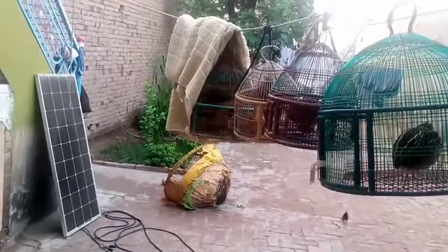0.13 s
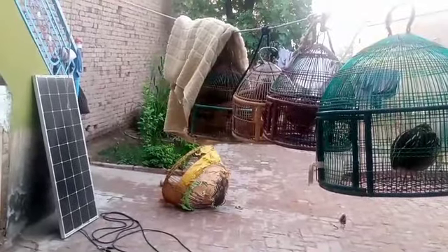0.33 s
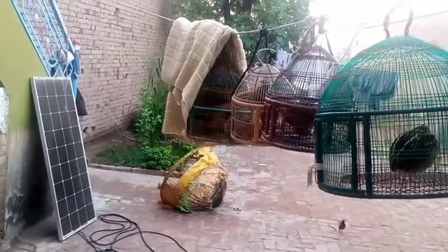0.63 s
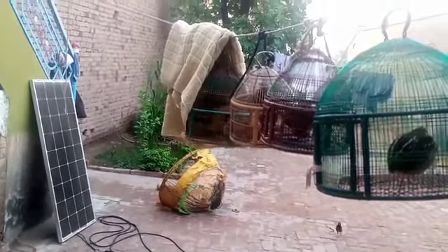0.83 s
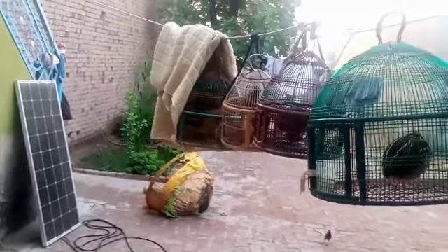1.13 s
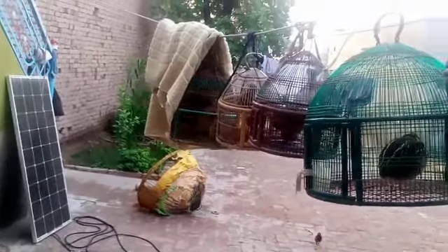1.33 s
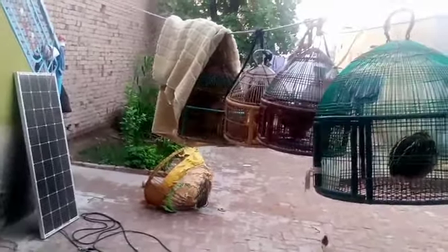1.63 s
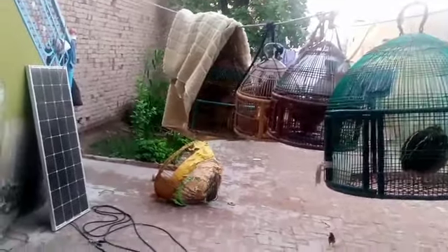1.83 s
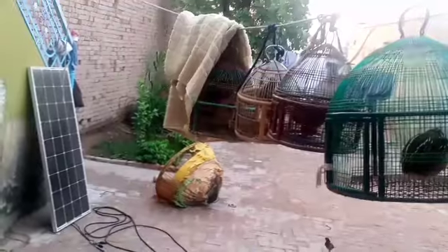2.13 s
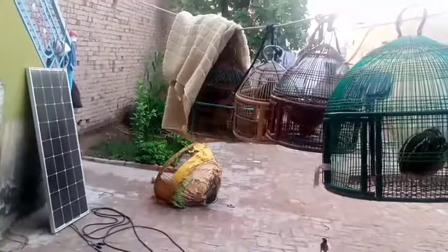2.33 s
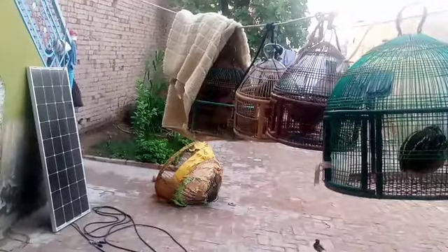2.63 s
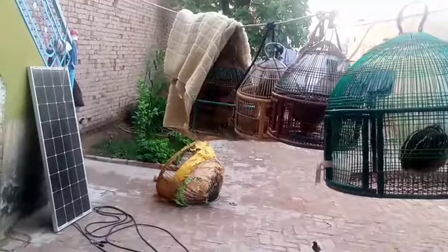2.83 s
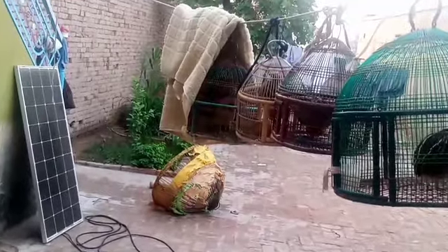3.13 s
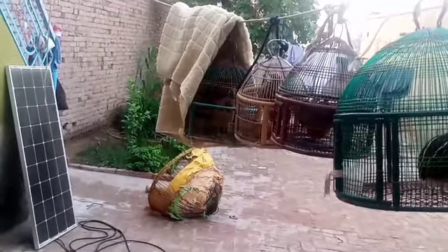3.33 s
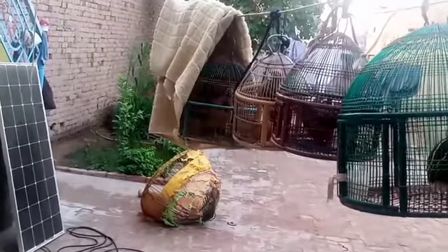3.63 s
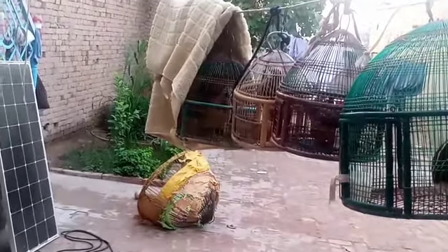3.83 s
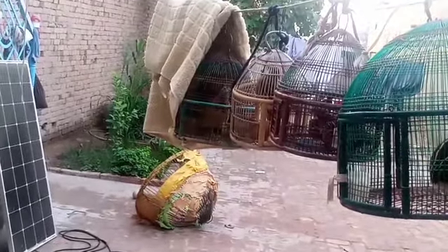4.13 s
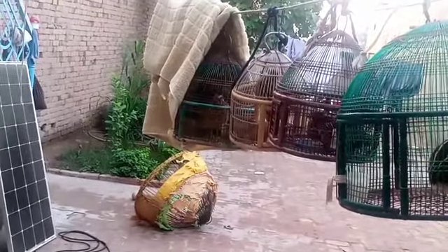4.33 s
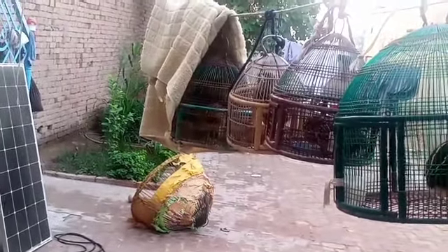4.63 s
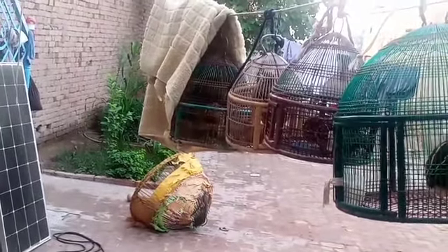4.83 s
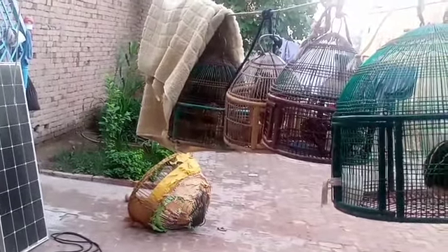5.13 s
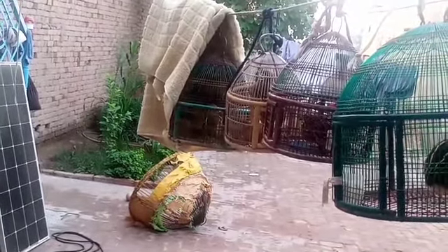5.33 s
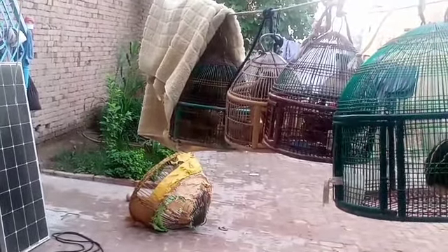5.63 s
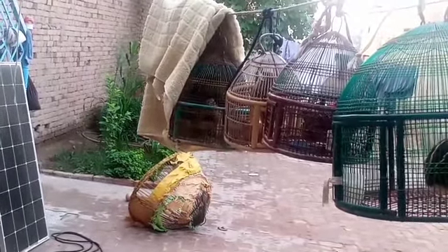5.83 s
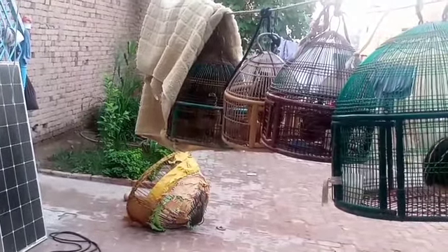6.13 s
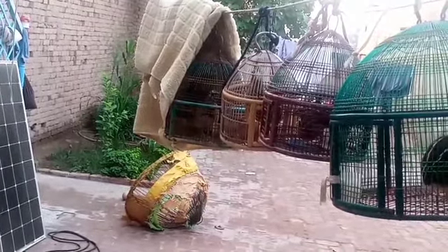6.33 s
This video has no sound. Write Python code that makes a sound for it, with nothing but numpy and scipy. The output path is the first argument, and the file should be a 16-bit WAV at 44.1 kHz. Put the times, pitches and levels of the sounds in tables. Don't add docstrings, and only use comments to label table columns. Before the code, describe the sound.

Loud, piercing quail double notes, evenly spaced, echo off courtyard walls over faint outdoor rush, a brief knock, shoe scrapes and distant birds.

```python
import sys
import numpy as np
from scipy import signal
from scipy.fft import rfft, irfft, next_fast_len
from scipy.io import wavfile
from scipy.ndimage import uniform_filter1d, map_coordinates

SR = 44100
rng = np.random.default_rng(int(sys.argv[2]) if len(sys.argv) > 2 else 0)


def ratio_of_db(decibels):
    return 10 ** (np.asarray(decibels, float) / 20)


def store_pcm(level_fs):
    pcm = np.round(np.clip(level_fs, -1, 1) * 32767).astype(np.int16)
    wavfile.write(sys.argv[1], SR, np.atleast_2d(pcm).T)


N = 286429
TIME = np.arange(N) / SR
DUCK_DB = 3


def unit(x):
    return x / np.sqrt(np.mean(x ** 2) + 1e-20)


def along(points, hz):
    f, value = np.transpose(points)
    return np.interp(np.log(hz + 1), np.log(f + 1), value)


def wobble(rate_hz):
    knots = rng.standard_normal(int(N * rate_hz / SR) + 4)
    return map_coordinates(knots, [TIME * rate_hz])


def filtered(x, response):
    size = next_fast_len(N + SR // 2)
    hz = np.fft.rfftfreq(size, 1 / SR)
    return irfft(rfft(x, size) * response(hz), size)[:N]


def rush(spectrum, patchy_db):
    hz, _, z = signal.stft(rng.standard_normal(N), SR, nperseg=1024)
    patches = uniform_filter1d(rng.standard_normal(z.shape), size=3, axis=0)
    patches = uniform_filter1d(patches, size=6, axis=1)
    depth_db = np.clip(patchy_db, 0, 5) * np.clip(hz / 400, 0, 1)[:, None]
    x = signal.istft(z * ratio_of_db(depth_db * unit(patches)), nperseg=1024)[1][:N]
    return unit(filtered(x, lambda hz: ratio_of_db(along(spectrum, hz))))


def narrow(hz, spread_hz, count):
    pole = [1, -np.exp(-2 * np.pi * spread_hz / SR)]
    slow = signal.lfilter([1], np.convolve(pole, pole), rng.standard_normal((2, count)))
    phase = 2 * np.pi * np.cumsum(hz + np.zeros(count)) / SR
    return unit(slow[0] * np.cos(phase) + slow[1] * np.sin(phase))


def air():
    # f/Hz, level/dB per Hz
    air_colour = [(15, -56.5), (25, -30.5), (73, -6.5), (130, -12.5), (323, -3.5), (441, -11), (485, -7),
                  (883, -15.5), (971, -8.5), (1120, -18.5), (2240, -9.5), (3290, -23.5), (5570, -27),
                  (7600, -33.5), (9880, -80.5), (16700, -120)]
    level_db = -62.5 - 0.45 * TIME
    murmur = ratio_of_db(level_db + 0.61 * wobble(2.5)) * rush(air_colour, patchy_db=6.0)
    whine_db = -67.5 + 3.5 * wobble(25) + 1.5 * wobble(3)
    whine = ratio_of_db(whine_db) * np.sin(2 * np.pi * 999.5 * TIME + .8 * wobble(25))
    insect = ratio_of_db(-82) * narrow(6480, spread_hz=250, count=N)
    return murmur + whine + insect


def quail():
    # whip passing 5.5 kHz t/s, start to whip t/s, held pitch f/Hz, slow bend f/Hz, level/dB
    notes_sung = [
        (0.0962, 0.074, 3215, 145, -5),
        (0.3104, 0.049, 3200, 150, -5),
        (1.4682, 0.076, 3208, 205, -4.5),
        (1.6835, 0.053, 3225, 180, -5),
        (2.8153, 0.0725, 3218, 235, -4.5),
        (3.0304, 0.052, 3238, 215, -3.5),
        (4.1567, 0.0743, 3225, 290, -4.5),
        (4.3742, 0.052, 3236, 235, -3.5),
        (5.4599, 0.075, 3222, 290, -4.5),
        (5.6787, 0.053, 3222, 165, -4.5),
    ]
    # t/s after the start, level/dB
    opening = [(0, -36), (.002, -22), (.005, -11), (.010, -1.5), (.018, -0.43)]
    # t/s from the whip, level/dB
    closing = [(-.03, -1), (-.015, -5.5), (-.005, -11.5), (0, -9.5), (.0015, -21), (.004, -34),
               (.008, -26.5), (.012, -58)]
    scoops_hz, scoop_s = (240.5, 45.3), .0185
    bend_s, whip_s = .0171, .0073
    whip_hz, ceiling_hz = 2199, 3800
    out = np.zeros(N)
    for (top, lead, hz, bend_hz, db), scoop_hz in zip(notes_sung, np.resize(scoops_hz, len(notes_sung))):
        t = np.arange(round((lead + 0.015) * SR)) / SR
        settle = 150 * np.exp(-t / .0025) + scoop_hz * np.exp(-t / scoop_s)
        climb = bend_hz * np.exp((t - lead) / bend_s) + whip_hz * np.exp((t - lead) / whip_s)
        whip = climb / (1 + (climb / ceiling_hz) ** 5) ** (1 / 5)
        phase = 2 * np.pi * np.cumsum(hz + settle + whip) / SR
        voice = np.sin(phase) + ratio_of_db(-46) * np.sin(2 * phase)
        shape_db = np.interp(t, *np.transpose(opening)) + np.interp(t - lead, *np.transpose(closing))
        out[round((top - lead) * SR):][:len(t)] += ratio_of_db(db + DUCK_DB + 1 + shape_db) * voice
    return out


def yard(x, tail_db):
    # delay t/s, level/dB
    walls = [(0.00088, -11.0), (0.00143, -11.5), (0.0037, -8.6), (0.00787, -4.2), (0.00871, -8.1),
             (0.00977, -15.0), (0.01075, -11.2), (0.01499, -11.7), (0.01542, -6.6), (0.01757, -4.9),
             (0.02161, -10.5), (0.02617, -12.5), (0.02986, -12.0), (0.03912, -19.4), (0.04587, -17.4)]
    # f/Hz, time to fall 60 dB t/s
    ring = [(200, 0.27), (2000, 0.12), (3300, 0.47), (4500, 0.46), (6000, .38), (7200, 0.48)]
    # f/Hz, level/dB
    colour = [(3200, -5), (3350, -4), (3600, 1.5), (4300, 0.4), (7000, 0.2)]
    hz, t, z = signal.stft(rng.standard_normal((2, SR)), SR, nperseg=256)
    decay_db = along(colour, hz)[:, None] - 60 * t / along(ring, hz)[:, None]
    tail = signal.istft(z * ratio_of_db(decay_db), SR, nperseg=256)[1]
    tail_time = np.arange(tail.shape[1]) / SR
    tail = tail * (1 - np.exp(-(tail_time / 0.042) ** 2))
    answer = ratio_of_db(tail_db) * tail / np.linalg.norm(tail[0])

    echoes = np.zeros(SR // 16)
    echoes[0] = 1
    delay, db = np.transpose(walls)
    echoes[np.round(delay * SR).astype(int)] = ratio_of_db(db)

    drift = 1.1 * wobble(9)
    shared = x * np.array([np.cos(drift), np.sin(drift)])
    dense = signal.fftconvolve(shared, answer, axes=1).sum(axis=0)
    return signal.fftconvolve(x, echoes)[:N] + dense[:N]


def peeps():
    # middle t/s, length t/s, f/Hz, level/dB
    coos = [
        (0.702, 0.067, 587, -66),
        (0.773, 0.13, 339, -70),
        (1.049, 0.13, 510, -67),
        (1.203, 0.32, 335, -69),
        (1.581, 0.11, 616, -63.5),
        (2.25, .12, 700, -64),
        (2.475, 0.093, 683, -64.5),
        (3.46, .1, 335, -64),
        (5.83, .12, 328, -63),
        (6.201, 0.049, 336, -61),
    ]
    # middle t/s, length t/s, f/Hz, level/dB
    whistles = [
        (1.065, 0.056, 5500, -75),
        (2.439, 0.057, 4500, -74),
        (2.595, 0.08, 3540, -75),
        (3.848, 0.31, 2172, -72.5),
        (5.36, 0.075, 2117, -61.5),
        (5.595, .06, 2050, -59),
    ]
    # middle t/s, length t/s, f/Hz, level/dB
    chirps = [
        (0.882, 0.1, 2405, -63.5),
        (1.131, 0.067, 2190, -67),
        (1.14, 0.055, 3300, -66.5),
        (1.25, .2, 5890, -64),
        (1.265, 0.19, 2298, -66.5),
        (2.349, 0.08, 5920, -74),
        (2.699, .06, 4860, -65),
        (6.292, 0.12, 6000, -77.5),
        (6.41, .08, 3510, -72),
    ]
    # middle t/s, length t/s, f/Hz, level/dB
    rustles = [
        (1.925, .08, 2300, -55.5),
        (2.123, .07, 817, -54.5),
        (5.071, 0.05, 1200, -59),
        (6.281, 0.087, 3610, -57.5),
    ]
    calls = [(*c, 30) for c in coos] + [(*c, 50) for c in whistles]
    calls += [(*c, 0.085 * c[2]) for c in chirps]
    calls += [(*c, 0.3 * c[2]) for c in rustles]
    out = np.zeros(N)
    for s, length, hz, db, spread_hz in calls:
        size = round(1.6 * length * SR)
        call = np.hanning(size) * narrow(hz, spread_hz, count=size)
        out[round(s * SR) - size // 2:][:size] += ratio_of_db(db) * call
    return out


def scuffs():
    # start t/s, hold t/s, fade by 20 dB t/s, body level/dB, grit over body level/dB
    drags = [
        (1.785, .05, 0, -56, -12),
        (1.897, .02, .14, -54, -8),
        (2.029, .008, 0.05, -53.5, -6),
        (2.085, .012, 0.08, -49, -1.5),
        (4.043, .03, 0.1, -62.5, 2.5),
        (4.588, .17, 0.17, -49.5, 2),
        (4.803, 0.093, .16, -46.5, 5.5),
        (5.06, 0.083, 0.1, -55.5, 0),
    ]
    # f/Hz, level/dB per Hz
    sole_colour = [(530, -56), (900, -32), (969, -21.5), (1210, -23.5), (1420, -6.5), (1720, -1),
                   (3200, -0.5), (4160, -29.5), (7040, -120)]
    # f/Hz, level/dB per Hz
    grit_colour = [(1650, -24.5), (2800, 0), (4760, -2), (5090, -9.5), (5700, -3.5), (6430, -12.5),
                   (7600, -36.5), (9880, -70), (16700, -120)]
    rise_s = .035
    sole, grit = rush(sole_colour, patchy_db=1.2), rush(grit_colour, patchy_db=1.2)
    s, hold, fade, body_db, grit_db = np.transpose(drags)[..., None]
    rise_or_fade = np.minimum((TIME - s) / rise_s, (s + hold - TIME) / fade)
    shape_db = 20 * np.minimum(0, rise_or_fade)
    press = ratio_of_db(body_db + np.maximum(shape_db, -200))
    body_level = np.linalg.norm(press, axis=0)
    grit_level = np.linalg.norm(press * ratio_of_db(grit_db), axis=0)
    return body_level * sole + grit_level * grit


def taps():
    # t/s, push level/dB, push f/Hz, click level/dB, click f/Hz
    contacts = [
        (1.9995, -20, 260, -28.5, 1800),
        (2.0042, -8.5, 214.6, -24, 3000),
        (2.1058, -70.5, 400, -33.5, 3350),
        (6.253, -73.5, 403, -33, 2920),
    ]
    case_hz = 55
    out, t = np.zeros(N), np.arange(SR // 16) / SR
    for s, push_db, push_hz, click_db, click_hz in contacts:
        slowing = .012 * (1 - np.exp(-t / 0.0081))
        ring = np.cos(2 * np.pi * push_hz * slowing - .4)
        push = np.exp(-t / 0.0024) * ring * (1 - np.exp(-t / 0.000304))
        click = (t / 0.00047) * np.exp(1 - t / 0.00042) * np.cos(2 * np.pi * click_hz * t)
        sway = 0.14 * np.exp(-t / .012) * np.sin(2 * np.pi * 76 * t)
        out[round(s * SR):][:len(t)] += ratio_of_db(push_db) * (push + sway) + ratio_of_db(click_db) * click
    return filtered(out, lambda hz: (1j * hz / (case_hz + 1j * hz)) ** 2)


def swish():
    # t/s, level/dB, hollow f/Hz
    slide = [
        (2.39, -71, 3320),
        (2.47, -52, 2560),
        (2.55, -54.5, 2100),
        (2.62, -54.5, 1850),
        (2.71, -53.5, 1950),
        (2.76, -46, 2100),
    ]
    s, level_db, hollow_hz = np.transpose(slide)
    db, hz = np.interp(TIME, s, level_db), np.interp(TIME, s, hollow_hz)
    gate = np.interp(TIME, [s[0] - .02, s[0], s[-1], s[-1] + 0.013], [0, 1, 1, 0])
    part = gate > 0
    size = np.count_nonzero(part)
    core = .5 * narrow(hz[part], spread_hz=70, count=size)
    hollow = 0.47 * narrow(hz[part], spread_hz=760, count=size)
    lower = 0.6 * np.linspace(0, 1, size) * narrow(1620, spread_hz=110, count=size)
    out = np.zeros(N)
    out[part] = core + hollow + lower
    return gate * ratio_of_db(db) * out


def scene():
    far = yard(quail(), tail_db=-7.5) + scuffs() + swish() + peeps() + air()
    return (far + taps())[None]


def band_limit(x):
    return signal.sosfilt(signal.butter(12, 16270, fs=SR, output="sos"), x)


def record(dry):
    # f/Hz, level/dB
    mic = [(20, -4.5), (100, 1.5), (2000, -1), (3300, -0.5), (5000, 0.5), (6300, 1.5), (7100, 0.5),
           (7500, -13.5), (8000, -26), (10000, -35), (12000, -49)]
    x = filtered(dry[0], lambda hz: ratio_of_db(along(mic, hz)))
    treble = (x - np.roll(x, shift=7)) / 2
    power = uniform_filter1d(treble ** 2, size=400)
    hold = np.exp(-1 / (0.025 * SR))
    loud = np.sqrt(np.abs(signal.lfilter([1 - hold], [1, -hold], power)))
    ducked = x * ratio_of_db(-DUCK_DB * loud / (loud + 0.012))
    clipped = np.clip(ducked, -.685, .675)
    hiss = ratio_of_db(-77.5) * rng.standard_normal(N) + ratio_of_db(-90) * narrow(14900, spread_hz=400, count=N)
    top_hz = 15900
    x = filtered(clipped + hiss, lambda hz: 1 / (1 + (hz / top_hz) ** 120))
    return band_limit(x[None])


dry = scene()
out = record(dry)
store_pcm(out)
```